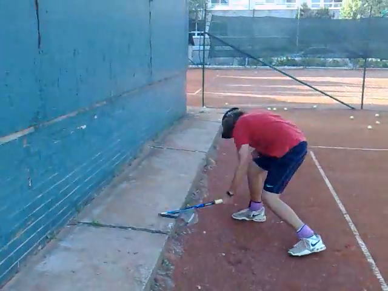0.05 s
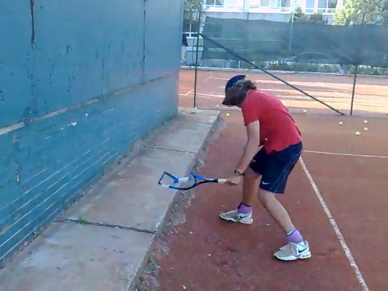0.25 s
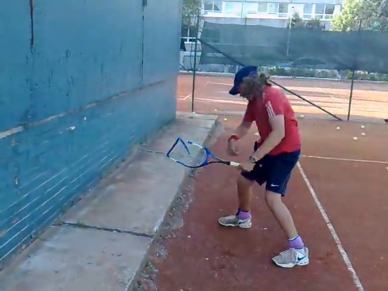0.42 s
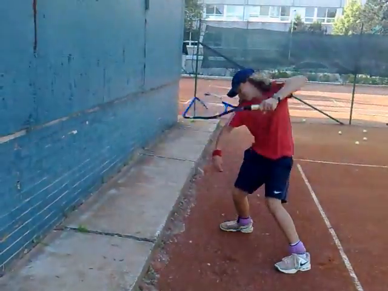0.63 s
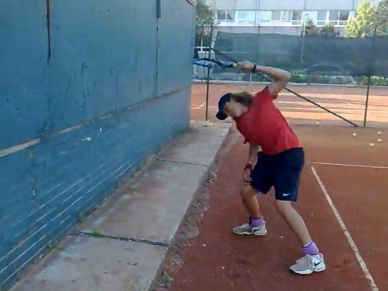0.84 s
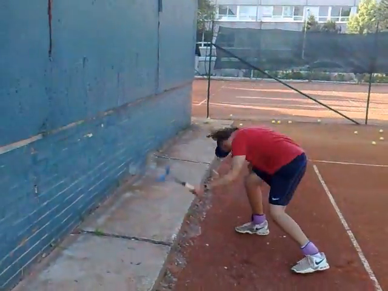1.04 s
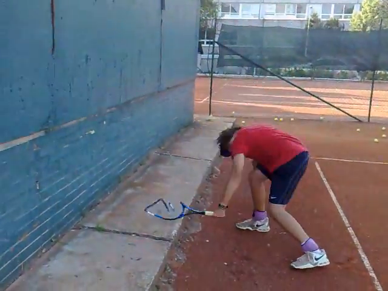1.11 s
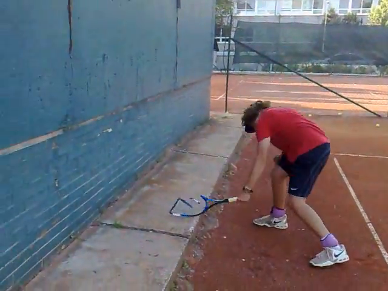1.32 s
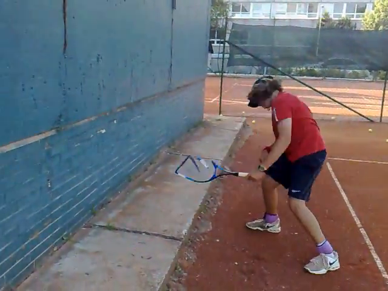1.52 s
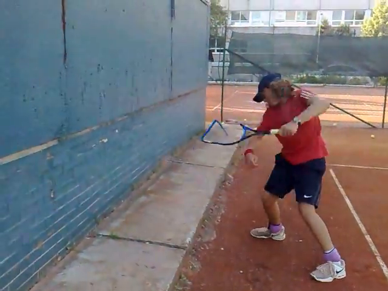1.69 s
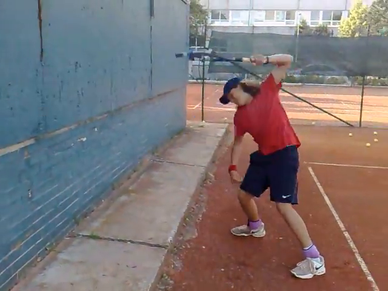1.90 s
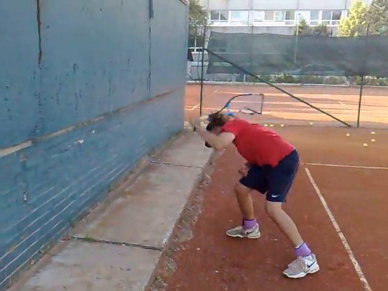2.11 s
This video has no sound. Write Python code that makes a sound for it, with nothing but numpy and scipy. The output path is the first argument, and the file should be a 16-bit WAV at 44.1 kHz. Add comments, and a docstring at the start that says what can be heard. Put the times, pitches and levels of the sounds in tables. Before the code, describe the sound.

Two loud, close cracks sound about a second apart as a tennis racket swishes down and breaks on concrete outdoors. The first briefly overloads the microphone, the second is crunchier. Both echo faintly over light wind and clothing rustle.

```python
"""On the concrete strip beside a practice wall, a tennis racket is smashed twice near the microphone.
Each swing swishes as air passes the strings; then snapping fibres crack and set the frame ringing.
The first blow overloads the microphone into a falling thump. Wall, fence and houses reflect the sound
over a distant knock, a quiet town, light wind and the rustle of clothes and shoes."""
import sys
import numpy as np
from scipy import signal
from scipy.fft import rfft, irfft
from scipy.io import wavfile

SR = 44100
rng = np.random.default_rng(int(sys.argv[2]) if len(sys.argv) > 2 else 0)


def store_pcm(level_fs):
    """Save levels as 16-bit WAV."""
    pcm = np.round(np.clip(level_fs, -1, 1) * 32767).astype(np.int16)
    wavfile.write(sys.argv[1], SR, np.atleast_2d(pcm).T)


N = 94815
T = np.arange(N) / SR

# the two smashes (impact time [s], swish level [dB], swish rise [s], gain into the court [dB],
# extra gain towards the far echoes [dB])
SMASHES = [(.241, -32, 0.034, 1, -10), (1.368, -35.5, 0.025, -1.5, 0)]


def racket():
    """Brittle fracture: snapping fibres radiate noise bursts and excite the frame's damped modes."""
    # cracks of the frame (time [s], level [dB], decay [s], share that rings the frame [ratio])
    cracks = [(0.2412, -3, 0.0031, 0.3), (.2478, -15, 0.0006, 0.22), (0.261, -29, .002, .3),
              (0.271, -25.5, 0.0037, 0.37), (1.369, 2, 0.00075, 0.47), (1.37, -1.5, 0.0012, 1),
              (1.3746, -8, 0.0019, .9), (1.3771, -13, 0.0014, .9), (1.3852, 1.5, 0.00081, 1),
              (1.3886, -6.5, .001, 1), (1.3914, -15.5, 0.00065, .8), (1.401, -20, 0.001, .7),
              (1.409, -29.5, .002, .7), (1.426, -31.5, .002, .3), (1.467, -42, 0.0027, .3)]
    # crunch of splinters and grit (time [s], level [dB], decay [s])
    crunches = [(.26, -25, 0.016), (1.372, -13.5, .014)]
    # fracture spectrum (frequency [Hz], relative level [dB])
    crack_spectrum = [(60, -23), (300, -20), (900, -23), (1500, -6), (2600, -9), (3800, 1), (5700, -3),
                      (7000, -1.5), (9000, -5.5), (13000, -7), (16000, -20)]
    # modes of the frame (frequency [Hz], relative level [dB])
    frame_modes = [(3526, -38), (4113, -39), (4484, -39.5), (5163, -32.5), (5572, -46), (6180, -45.5),
                   (6315, -44), (6874, -38.5), (7241, -38), (8010, -43.5), (8710, -47), (10056, -48),
                   (10492, -41), (10971, -44.5)]
    attack_s, frame_t60_s = .00026, .065
    force = sum(undb(db) * burst(at, attack_s, decay) for at, db, decay, _ in cracks)
    shake = sum(share * undb(db) * burst(at, attack_s, decay) for at, db, decay, share in cracks)
    crunch = sum(undb(db) * burst(at, .0034, decay) for at, db, decay in crunches)
    fibres = rng.standard_normal(N) * undb(-rng.standard_normal(N))  # 1 dB of random spread
    fibres /= fibres.std()
    ring = sum(undb(db) * np.sin(2 * np.pi * hz * T) for hz, db in frame_modes)
    ring *= np.exp(-np.log(1000) * T / frame_t60_s)
    direct = through((force + crunch) * fibres, colour(crack_spectrum))
    return direct + through(shake * fibres, with_gain(ring, db=-8.5))


def swish():
    """Turbulence: air through the strings grows louder with the swing and stops at the ground."""
    # airflow spectrum (frequency [Hz], relative level [dB])
    air_spectrum = [(50, -3.5), (190, 7.5), (350, -8), (1600, -6.5), (2400, -13), (3400, -3.5),
                    (5500, -19.5), (10000, -34), (15000, -47.5)]
    envelope = np.zeros(N)
    for at, db, rise, _, _ in SMASHES:
        width_s = np.where(T < at, rise, .004)
        envelope += undb(db) * np.exp(-(np.abs(T - at) / width_s) ** 1.2)
    return envelope * noise(air_spectrum)


def bumps():
    """Impact: each brief contact of the bouncing frame with the concrete gives a dull knock."""
    # contacts (time [s], level [dB], decay [s])
    contacts = [(.246, -15, .005), (.2735, -15.5, .002), (1.3935, -35.5, .005), (1.4265, -29.5, 0.0049)]
    # impact spectrum (frequency [Hz], relative level [dB])
    bump_spectrum = [(80, -3.5), (400, -4), (700, 6), (1050, -7.5), (1700, -4), (2600, -14), (6000, -30.5),
                     (15000, -46.5)]
    envelope = sum(undb(db) * burst(at, .0005, decay) for at, db, decay in contacts)
    return envelope * noise(bump_spectrum)


def twangs():
    """Resonance: noise-driven narrow rings, perhaps of slack strings and the scraping frame."""
    # rings (peak time [s], frequency [Hz], bandwidth [Hz], level [dB], half-length [s])
    rings = [(.315, 370, 60, -50, 0.031), (0.3953, 595, 32, -46, 0.017), (0.28, 3470, 750, -37, 0.028),
             (0.359, 3530, 920, -49.5, 0.027)]
    out = np.zeros(N)
    for at, hz, bandwidth, db, half_length in rings:
        resonance = np.sin(2 * np.pi * hz * T) * np.exp(-np.pi * bandwidth * T)
        ringing = through(rng.standard_normal(N), with_gain(resonance, db))
        out += ringing * np.exp(-((T - at) / half_length) ** 2)
    return out


def overload():
    """Overload recovery: the microphone swings ever more slowly, sticks, and drifts back to rest."""
    # falling swings (time [s], start frequency [Hz], glide [s], hold [s], release [s], drive [dB])
    swings = [(.2442, 2270, .0017, .0057, .0003, 1), (.2502, 1100, .0039, .0235, .007, 1)]
    out = np.zeros(N)
    for at, hz, glide, hold, release, db in swings:
        age = np.maximum(T - at, 0)
        cycles = hz * glide * (1 - np.exp(-age / glide))
        envelope = np.exp(-np.maximum(age - hold, 0) / release)
        out += undb(db) * np.sin(2 * np.pi * cycles) * envelope
    return out


def scatter(power, envelope, db, spectrum):
    """Incoherent scattering: powers add, so the return is noise that follows the smeared source power."""
    returned_power = through(power, with_gain(envelope, db) ** 2)
    return np.sqrt(np.abs(returned_power)) * noise(spectrum)


def court(smash):
    """Diffuse reflection: court, wall, fence and houses answer in turn, with far echoes and a tail."""
    # spectra of the returns (frequency [Hz], relative level [dB])
    near_spectrum = [(100, -8), (600, -5.5), (1500, -0.5), (3000, -3), (4500, 2), (7000, -6.5),
                     (11000, -12), (16000, -21)]
    wall_spectrum = [(200, -10.5), (4000, -5.5), (10500, 1.5), (16000, -12)]
    fence_spectrum = [(200, -24), (2000, -8), (5500, -0.5), (8500, -7), (15000, -21)]
    house_spectrum = [(100, -22), (900, -22.5), (1600, -9), (2600, -3), (3900, -0.5), (6200, -7.5),
                      (9000, -26), (15000, -32)]
    far_spectrum = [(100, -13), (900, -29), (1600, -8), (3700, 0), (6000, -9.5), (9000, -35.5),
                    (15000, -50)]
    tail_spectrum = [(100, -8), (700, -8), (2200, -0.5), (4000, -2), (7000, -16), (10000, -29.5),
                     (15000, -45)]
    # distinct far echoes (delay [s], relative level [dB], smear [s])
    echoes = [(0.335, -39, .008), (0.359, -38, 0.0022), (0.54, -40.5, .009)]
    tail_t60_s = 1.2
    impacts, _, _, court_db, far_db = np.array(SMASHES).T
    power = (smash * undb(np.interp(T, impacts, court_db))) ** 2
    # the fence and the far echoes mostly carry the first crack of each smash
    onset_power = power * sum(burst(at, .0001, .018) for at in impacts)
    far_power = onset_power * undb(np.interp(T, impacts, far_db)) ** 2
    near = scatter(power, swell(.0031, .0125), db=-17, spectrum=near_spectrum)
    wall = scatter(power, burst(.0475, .0005, .001), db=-23.5, spectrum=wall_spectrum)
    fence = scatter(onset_power, burst(.1575, .00041, .0013), db=-38.5, spectrum=fence_spectrum)
    houses = scatter(power, swell(.14, .02), db=-25.5, spectrum=house_spectrum)
    far = sum(scatter(far_power, burst(delay, .00091, smear), db, far_spectrum)
              for delay, db, smear in echoes)
    tail = scatter(power, burst(.098, .05, tail_t60_s / np.log(1000)), db=-32, spectrum=tail_spectrum)
    return near + wall + fence + houses + far + tail


def distant_knock():
    """Impact and reflection: a hollow knock, perhaps a ball on another court, and its soft echo."""
    # spectra of the knock and its echo (frequency [Hz], relative level [dB])
    knock_spectrum = [(100, -31.5), (400, -40), (600, 8.5), (850, -15), (1200, 4), (1500, -8.5), (2150, 4),
                      (2800, -12), (5000, -30), (12000, -52)]
    echo_spectrum = [(200, -45), (1400, -7.5), (2200, 5), (2900, -22), (5000, -25.5), (12000, -52)]
    knock_s, echo_delay_s = 1.0655, .063
    envelope = burst(knock_s, .0005, .002) + undb(-20) * burst(knock_s, .003, .025)
    direct = undb(-34.5) * noise(knock_spectrum) * envelope
    echo = undb(-52.5) * noise(echo_spectrum) * burst(knock_s + echo_delay_s, .005, .2)
    return direct + echo


def background():
    """Superposition of noises: a steady distant town, wind on the microphone, clothes and shoes."""
    # course of the rumble and rustle (time [s], wind level [dB], rustle level [dB])
    movement = [(0, -46.5, -55.5), (.12, -52, -49.5), (.22, -56, -59), (.35, -57, -67.5),
                (.7, -69.5, -65.5), (1.1, -61.5, -65.5), (1.31, -57, -51.5), (1.48, -59.5, -73.5),
                (1.72, -61.5, -61.5), (1.849, -50, -55), (1.94, -55.5, -56), (2, -48, -56),
                (2.04, -64, -58), (2.1, -48, -56), (2.15, -58.5, -56.5)]
    # spectra of the three noises (frequency [Hz], relative level [dB])
    wind_spectrum = [(20, -7.5), (65, -2), (110, -2), (170, -3.5), (280, -15), (700, -36.5), (4000, -68.5)]
    rustle_spectrum = [(60, -6.5), (300, 1.5), (700, 2), (1600, -3), (4000, -9.5), (8000, -31),
                       (15000, -39.5)]
    town_spectrum = [(15, -39), (25, -7.5), (70, 5), (97, -9.5), (149, -0.5), (301, -25), (714, -19.5),
                     (775, -11), (1020, -35.5), (1100, -24), (2910, -30), (3340, -24.5), (16000, -73.5)]
    times, wind_db, rustle_db = np.array(movement).T
    wind = undb(np.interp(T, times, wind_db)) * noise(wind_spectrum)
    rustle = undb(np.interp(T, times, rustle_db)) * noise(rustle_spectrum)
    return undb(-61) * noise(town_spectrum) + wind + rustle


def undb(db):
    """The decibel scale: 20 dB is a factor of ten in amplitude."""
    return 10 ** (np.asarray(db) / 20)


def colour(spectrum):
    """Minimum-phase filter: a causal impulse response of unit energy with the given spectrum."""
    hz, db = np.array(spectrum).T
    size = 4096
    log_hz = np.log(np.fft.rfftfreq(size, 1 / SR) + 1)
    log_gain = np.log(undb(np.interp(log_hz, np.log(hz), db)))
    cepstrum = irfft(log_gain)
    cepstrum[1:size // 2] *= 2  # fold onto positive time
    cepstrum[size // 2 + 1:] = 0
    response = irfft(np.exp(rfft(cepstrum)))
    return response / np.linalg.norm(response)


def through(x, response):
    """Convolution: a signal passes through a linear system."""
    return signal.fftconvolve(x, response)[:N]


def noise(spectrum):
    """Spectral shaping: filtered white noise, steady at an rms of about 1."""
    response = colour(spectrum)
    return signal.fftconvolve(rng.standard_normal(N + len(response) - 1), response, "valid")


def burst(start_s, attack_s, decay_s):
    """Exponential damping: an envelope that rises, then decays."""
    age = np.maximum(T - start_s, 0)
    return (1 - np.exp(-age / attack_s)) * np.exp(-age / decay_s)


def swell(delay_s, spread_s):
    """Spread of arrival times: the envelope of scattered sound builds softly and dies away."""
    age = np.maximum(T - delay_s, 0) / spread_s
    return age ** 1.8 * np.exp(-age)


def with_gain(response, db):
    """Energy normalisation: scale an impulse response to an overall gain."""
    return response * undb(db) / np.linalg.norm(response)


def scene():
    """Superposition: the smashes, their reflections and the surroundings add in one channel."""
    smash = racket() + swish() + bumps()
    return (smash + court(smash) + twangs() + distant_knock() + background())[None]


def record(dry):
    """Saturation: the overload thump is added, peaks are softly clipped and the top treble is cut."""
    thump_limit, ceiling, cutoff_hz = .7, .72, 15800
    driven = dry + thump_limit * np.tanh(overload() / thump_limit)
    clipped = driven / (1 + (driven / ceiling) ** 6) ** (1 / 6)
    low_pass = signal.ellip(8, .2, 80, cutoff_hz, fs=SR, output="sos")
    return signal.sosfilt(low_pass, clipped)


dry = scene()
out = record(dry)
store_pcm(out)
```